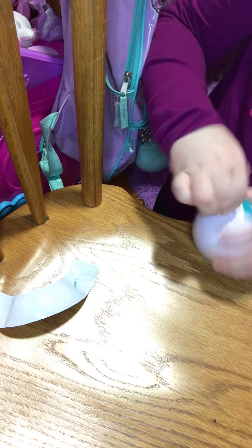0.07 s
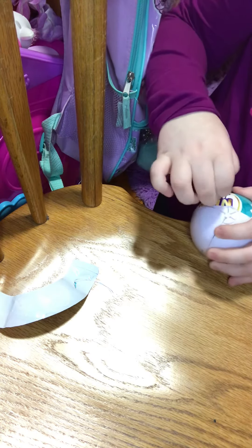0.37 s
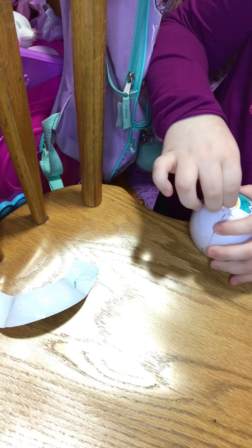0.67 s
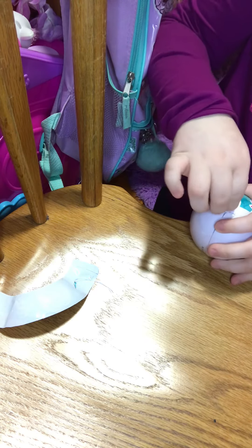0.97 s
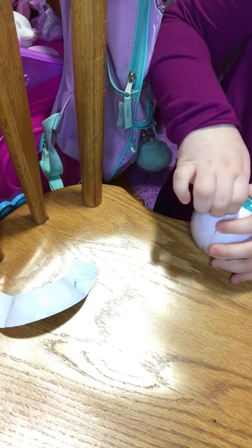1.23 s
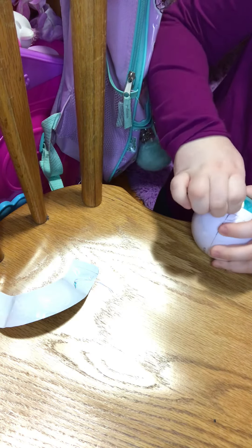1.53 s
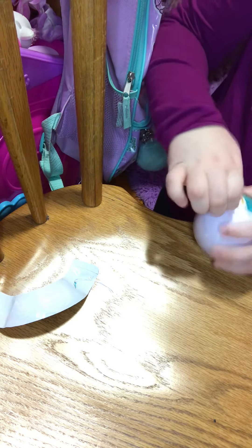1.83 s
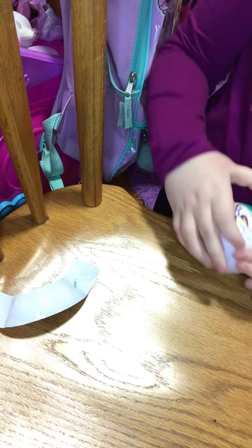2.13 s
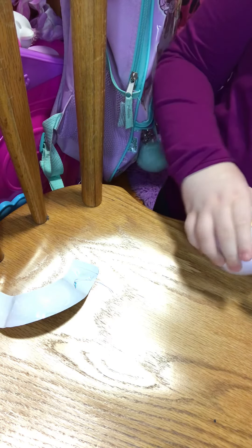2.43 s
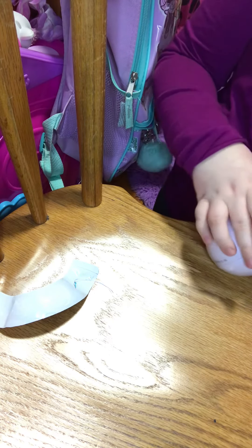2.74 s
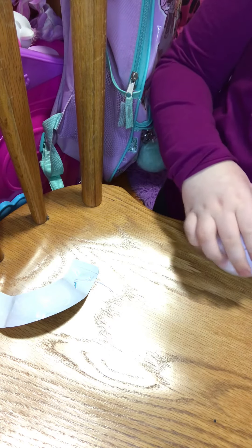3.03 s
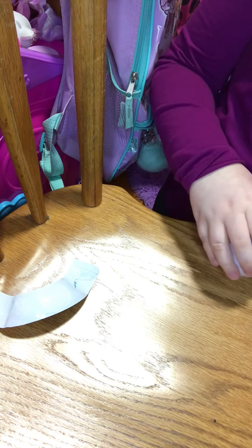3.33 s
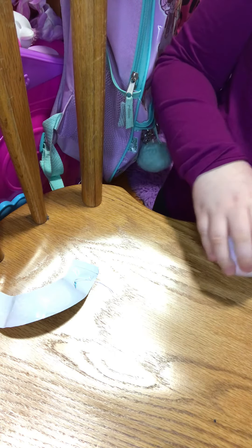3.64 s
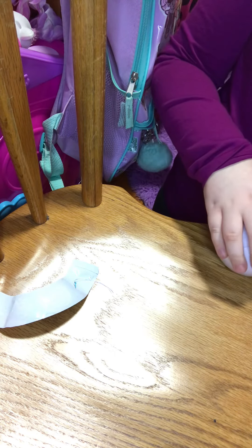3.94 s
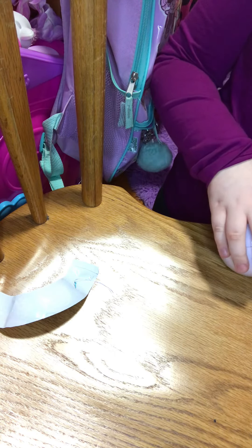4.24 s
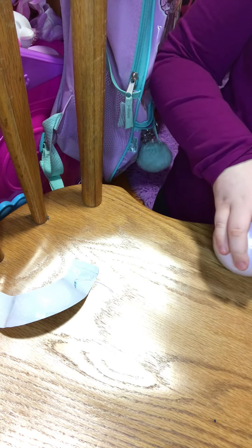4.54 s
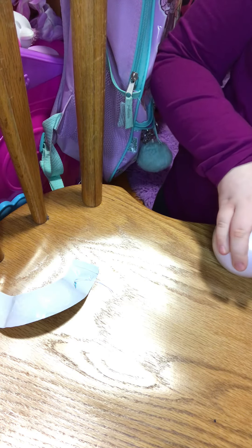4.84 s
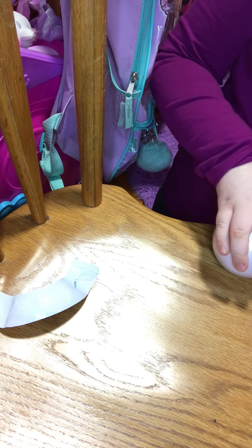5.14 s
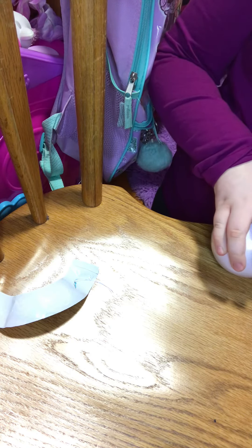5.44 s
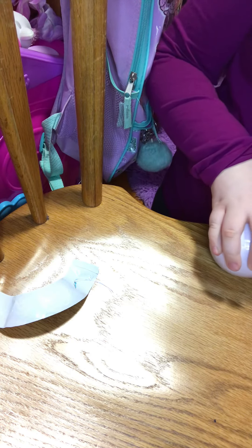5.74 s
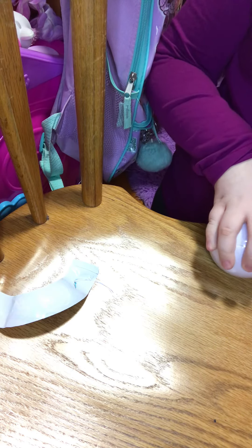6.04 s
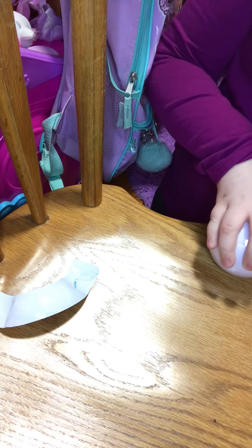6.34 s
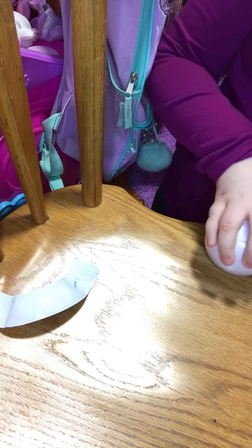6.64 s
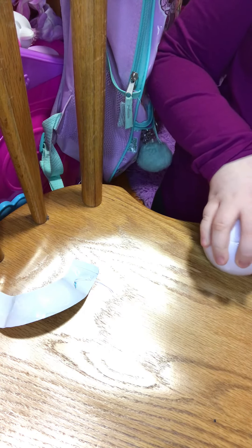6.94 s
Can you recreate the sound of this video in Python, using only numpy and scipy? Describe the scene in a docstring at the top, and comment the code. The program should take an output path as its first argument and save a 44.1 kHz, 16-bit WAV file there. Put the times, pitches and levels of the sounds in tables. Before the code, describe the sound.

Fingernails pick at the seam of a hollow plastic ball, making a cluster of short bright cracks as it knocks on a wooden seat. After a lull comes one sharp snap, then soft rubbing, small ticks and light bumps. Later the tight halves squeak thinly and scrape as they twist, followed by a couple more clicks and knocks. The sounds are close, in a small quiet room.

```python
"""Picking at a plastic ball

In a small quiet room, a child picks at the seam of a hollow plastic ball held against a wooden seat.
Nails and seam snap with short bright cracks, the ball bumps the wood and makes it ring, fingers rub
the shell, and the tight halves squeak thinly and scrape as they are twisted."""
import sys
import numpy as np
from scipy import signal
from scipy.fft import rfft, irfft
from scipy.io import wavfile
from scipy.ndimage import uniform_filter1d

SR = 44100
rng = np.random.default_rng(int(sys.argv[2]) if len(sys.argv) > 2 else 0)


def waveform_to_disk(signal):
    """Save audio, clipped to [-1, 1], as 16-bit WAV at the path in sys.argv[1]."""
    frames = np.transpose(np.atleast_2d(signal))
    scaled = np.clip(frames, -1, 1) * 32767
    samples = np.round(scaled).astype(np.int16)
    wavfile.write(sys.argv[1], SR, samples)


N = 308700
T = np.arange(N) / SR

# the notes the plastic shell rings at: (pitch [Hz], level [dB])
SHELL_NOTES = [(1040, -3), (1650, -5), (1950, -0.5), (2290, -7.5), (2700, -5.5), (2970, -1.5), (3780, 6.5),
               (4450, -5), (5200, -1.5), (5560, 4.5), (5850, -1), (6600, 3), (7550, -5), (8250, -16.5),
               (9280, -8), (11750, -5.5), (13400, -18.5), (14450, -12.5)]
# the notes the wooden seat rings at: (pitch [Hz], level [dB], time to fade by 60 dB [s])
WOOD_NOTES = [(271.3, -8.5, .45), (328.5, 3.5, .14), (359, 0, .2), (441, -14, .15), (515, -9.5, .13),
              (730, -6, 0.16), (824, -17.5, 0.11), (958, -2.5, .11), (1055, -12, 0.11), (1170, -13, 0.15),
              (1292, -20, .22)]
# the tone of a slip on the plastic: (frequency [Hz], level [dB])
CRACK_TONE = [(100, -22), (400, -14), (900, -6.5), (1900, -2.5), (3500, -2), (6500, -2.5), (8200, -10),
              (10300, -18), (12000, -14), (16000, -17.5)]


def undb(db):
    """Turn decibels into a number to multiply by."""
    return 10 ** (np.asarray(db) / 20)


def level(x, db):
    """Set a sound's average (rms) level."""
    return x * undb(db) / np.sqrt(np.mean(x ** 2))


def burst(x, db):
    """Give a short sound the energy of a hundredth of a second at this level."""
    return x * undb(db) * np.sqrt(SR / 100 / np.sum(x ** 2))


def fade(t, t60):
    """Die away by 60 dB every t60 seconds."""
    return np.exp(-np.log(1000) * t / t60)


def add(out, s, x):
    """Mix x into out, starting at s seconds."""
    i = max(int(s * SR), 0)
    out[i:i + len(x)] += x[:N - i]


def colour(x, points, size=4096):
    """Shape the tone of x along a curve of (frequency [Hz], level [dB]) points."""
    hz, db = np.transpose(points)
    grid_hz = np.arange(size // 2 + 1) * SR / size + 1
    log_gain = np.log(undb(np.interp(np.log(grid_hz), np.log(hz), db)))
    # build the filter so that it rings only after a hit, never before
    cepstrum = irfft(log_gain)[:size // 2]
    cepstrum[1:] *= 2
    response = irfft(np.exp(rfft(cepstrum, size)))
    return signal.fftconvolve(x, response)[:len(x)]


def contact(tilt_db, top_db=0):
    """Tone curve of a touch: a higher tilt, in dB per octave, is brighter."""
    return [(hz, tilt_db * np.log2(hz / 3000) + top_db * (hz > 7500)) for hz in (900, 6800, 8200, 12000)]


def resonate(x, hz, width_hz):
    """Let x ring at one pitch; a narrower width rings longer."""
    return signal.lfilter(*signal.iirpeak(hz, hz / width_hz, fs=SR), x)


def wander(rate):
    """A smooth random drift of about 1 either way, with `rate` new values a second."""
    hold = int(SR / rate)
    steps = np.repeat(rng.standard_normal(N // hold + 1), hold)
    return 1.3 * uniform_filter1d(uniform_filter1d(steps, hold), hold)[:N]


def friction(rate, spread_db):
    """Tiny slips of uneven strength at random moments, about `rate` a second."""
    sizes = undb(spread_db * np.minimum(rng.exponential(size=N), 5))
    happens = rng.random(N) < rate / SR
    return level(happens * sizes * rng.choice([-1, 1], N), 0)


def push(start_s, rise_s, hold_s, fade_db_per_s):
    """Loudness of one push of the fingers: it builds, holds and dies away."""
    t = T - start_s
    return np.clip(t / rise_s, 0, 1) * undb(-fade_db_per_s * np.clip(t - rise_s - hold_s, 0, 1))


def hush(air_db=-66.5, hum_db=-77):
    """Steady room noise, strongest in the bass, with a weak wavering electric hum."""
    # the tone of the quiet room: (frequency [Hz], level [dB])
    air_tone = [(12, -40), (20, -16.5), (43, -3), (86, -5.5), (123, -3), (150, -8.5), (328, -10),
                (399, -22), (527, -13.5), (624, -18.5), (976, -18.5), (2140, -24.5), (6360, -28),
                (14700, -38), (16000, -40)]
    air = level(colour(rng.standard_normal(N), air_tone), air_db) * undb(0.8 * wander(3.4))
    hum = level(np.sin(2 * np.pi * 119.7 * T), hum_db) * undb(4.7 * wander(5.6))
    return air + hum


def room(x, tail_db=-9.5, echo_db=-12, size=22050):
    """Near surfaces send back two smeared echoes; a short tail follows and loses its treble first."""
    # how the walls tint the sound: (frequency [Hz], level [dB])
    wall_tone = [(100, -1.5), (500, 1.5), (1000, 0), (2000, -3.5), (5000, -0.5), (9000, -3.5), (16000, -4)]
    t, noise = np.arange(size) / SR, rng.standard_normal(size)
    low = signal.sosfiltfilt(signal.butter(2, 1800, fs=SR, output="sos"), noise)
    below_top = signal.sosfiltfilt(signal.butter(2, 8000, fs=SR, output="sos"), noise)
    middle, high = below_top - low, noise - below_top
    tail = low * fade(t, t60=.41) + middle * fade(t, t60=.23) + high * fade(t, t60=.16)
    tail *= np.clip((t - .002) / .008, 0, 1)  # builds up over 8 ms
    echo_shape = sum(np.exp(-((t - delay_s) / .002) ** 2) for delay_s in (.0102, .0168))
    echoes = rng.standard_normal(size) * echo_shape
    response = tail * undb(tail_db) / np.linalg.norm(tail)
    response += echoes * undb(echo_db) / np.linalg.norm(echoes)
    return signal.fftconvolve(x, colour(response, wall_tone))[:N]


def rolling(creep_db=-78, waver_db=3):
    """The ball creeps on the seat and keeps the wood murmuring, louder when it rolls."""
    # small rolls of the ball: (middle [s], half length [s], level [dB])
    rolls = [(0.998, 0.043, -67.5), (2.195, 0.21, -61), (2.444, 0.18, -63.5), (2.862, 0.065, -69),
             (3.048, 0.18, -72.5), (3.605, 0.2, -70.5), (6.106, 0.053, -69)]
    grains = friction(rate=120, spread_db=1)
    wood = sum(undb(db - 4.5 * np.log2(hz / 350)) * resonate(resonate(grains, hz, 22), hz, 160)
               for hz, db, _ in WOOD_NOTES)
    motion = np.full(N, undb(creep_db))
    for s, half_s, db in rolls:
        add(motion, s - half_s, undb(db) * np.hanning(int(2 * half_s * SR)))
    return level(wood, 0) * motion * undb(waver_db * wander(12))


def jolts(t60=0.27, rise_s=0.017, size=22050):
    """A dull thump swells through arms and seat after a strong snap or a change of grip."""
    # jolts of the hands: (time [s], level [dB])
    thumps = [(0.037, -41.5), (.11, -41), (1.817, -44), (1.93, -50), (2.269, -57.5), (2.455, -59),
              (2.82, -56.5), (3.08, -57.5), (4.771, -45), (5.32, -58), (5.462, -44), (6.568, -44)]
    # their deep tone: (frequency [Hz], level [dB])
    thump_tone = [(25, -29), (48, -3), (80, -1), (130, 5), (200, -12), (400, -16), (1000, -47), (4000, -86)]
    out, t = np.zeros(N), np.arange(size) / SR
    swell = fade(t, t60) * (1 - np.exp(-t / rise_s))
    for s, db in thumps:
        add(out, s, burst(colour(rng.standard_normal(size) * swell, thump_tone), db))
    return out


def bumps(spot_lift_db=5.5, spot_octaves=0.24, scatter_db=2.5, press_s=0.0016, size=22050):
    """The wood rings and thuds under each bump; soft bumps stir mostly its lowest notes."""
    # the ball hits the seat:
    # (time [s], level [dB], hardness [dB per octave], struck spot's note [Hz], thud against ring [dB])
    hits = [(.04, -42.5, 1, 323, -8), (.109, -44, -7, 325, -5), (.126, -40, -2, 510, -4),
            (.1355, -28, 1, 970, -9), (1.258, -56.5, -4, 330, -3), (1.38, -59.5, 11, 965, -4),
            (1.821, -37.5, -2.5, 270, -13), (2.038, -37.5, -2.5, 732, -15), (2.223, -47.5, -2.5, 316, -18),
            (2.365, -60, 3.5, 960, -16), (2.465, -51, 4, 840, -24), (2.828, -56.5, -21, 270, -7),
            (3.178, -53.5, -2, 364, -14), (3.525, -55, -3, 325, -14), (4.279, -42.5, -8, 270, -20),
            (4.773, -47.5, -0.5, 270, 1), (5.008, -58, -4, 364, -10), (5.319, -55, -9, 357, -14),
            (5.465, -50.5, 3.5, 1184, -6), (6.2837, -37.5, -7.5, 360, -3), (6.575, -43.5, 4, 364, -3.5)]
    # the dull thud: (frequency [Hz], level [dB])
    thud_tone = [(60, -16.5), (180, -10), (300, 2), (550, -5), (1200, -6.5), (1700, -20), (5000, -40.5)]
    out, t = np.zeros(N), np.arange(size) / SR
    hz, note_db, t60 = np.transpose(WOOD_NOTES)
    for s, db, hard_db, spot_hz, thud_db in hits:
        detuned_hz = hz * (1 + .004 * rng.standard_normal(len(hz)))
        notes = np.sin(2 * np.pi * np.outer(detuned_hz, t)) * fade(t, t60[:, None])
        # each spot on the seat favours the notes near its own
        spot_db = spot_lift_db * np.exp(-(np.log2(hz / spot_hz) / spot_octaves) ** 2)
        spot_db += scatter_db * rng.standard_normal(len(hz))
        ring = undb(note_db + spot_db + hard_db * np.log2(hz / 350)) @ notes
        # the ball pressing on the wood soon takes the first strength out of the ring
        ring *= (1 + undb(-3) * fade(t, t60=.01)) * (1 - np.exp(-t / press_s)) ** 2
        thud = colour(rng.standard_normal(size) * fade(t, t60=.078), thud_tone)
        add(out, s, burst(burst(ring, 0) + burst(thud, thud_db), db))
    return signal.sosfilt(signal.butter(2, 170, "high", fs=SR, output="sos"), out)


def rubs(catch_db=-1):
    """Skin and nails drag over the shell in grainy swells; it ticks whenever a nail catches."""
    # finger strokes: (middle [s], half length [s], level [dB], brightness [dB per octave])
    strokes = [(0.164, 0.099, -58, -5.5), (1.86, 0.063, -52, -1.5), (2.126, 0.29, -68, -4.5),
               (2.51, 0.33, -72, 2), (2.993, 0.065, -71.5, 3.5), (3.174, 0.028, -63, -6),
               (3.369, 0.22, -77.5, 0.5), (3.536, 0.053, -58, 1.5), (3.664, .12, -74, 3),
               (3.938, 0.043, -71.5, -0.5), (4.281, 0.043, -65.5, -5), (4.719, 0.022, -64.5, -2.5),
               (4.993, 0.033, -51.5, 2.5), (6.432, 0.1, -73, -1)]
    catches = friction(rate=49, spread_db=-1)
    ticks = sum(undb(db) * resonate(catches, hz, 170) for hz, db in SHELL_NOTES)
    grains = colour(friction(rate=2300, spread_db=2), CRACK_TONE)
    rubbing = level(grains, 0) + level(ticks, catch_db)
    out = np.zeros(N)
    for s, half_s, db, tilt_db in strokes:
        start, count = s - half_s, int(2 * half_s * SR)
        stroke = rubbing[int(start * SR):][:count]
        add(out, start, level(colour(stroke, contact(tilt_db)), db) * np.hanning(len(stroke)))
    return out


def chirps(width_hz=200):
    """A fingertip sticks and slips on the shell, ringing briefly around one pitch."""
    # fingertip skids: (middle [s], half length [s], pitch [Hz], level [dB])
    skids = [(3.013, .005, 3430, -63.5), (3.023, 0.0041, 3270, -59), (3.024, 0.0048, 2050, -58.5),
             (6.754, 0.023, 3500, -62), (6.756, .022, 2830, -62.5), (6.747, 0.026, 1840, -68.5)]
    out, slips = np.zeros(N), friction(rate=7000, spread_db=-2)
    for s, half_s, hz, db in skids:
        start, count = s - half_s, int(2 * half_s * SR)
        ringing = resonate(resonate(slips, hz, width_hz), hz, 2 * width_hz)
        tone = ringing[int(start * SR):][:count]
        add(out, start, level(tone, db) * np.hanning(len(tone)))
    return out


def scrapes(hiss_db=-18, waver_db=1.5, fade_db_per_s=146.5):
    """Crowded slips make the seam ring and hiss; each twist has its own loudness and brightness."""
    # the notes the sliding seam rings at: (pitch [Hz], width [Hz], level [dB])
    seam_notes = [(2710, 400, -17), (3495, 65, 4.5), (4190, 160, -1), (7400, 360, -12), (8680, 92, 0),
                  (8980, 120, -5), (12900, 600, -19.5), (15300, 500, -16)]
    # the overall tone of a scrape: (frequency [Hz], level [dB])
    scrape_tone = [(1000, 0.5), (7000, 2.5), (9300, 1), (10200, -9), (14800, -6.5), (16000, -18)]
    # twists of the halves: (start [s], rise [s], hold [s], level [dB], brightness [dB per octave])
    twists = [(5.223, 0.022, 0.044, -81.5, 3), (5.536, .06, 0.06, -64.5, -3),
              (5.97, 0.05, 0.055, -78.5, -7), (6.094, 0.011, 0.042, -47, 2.5)]
    out, slips = np.zeros(N), friction(rate=11000, spread_db=2.5)
    rim = sum(undb(db) * resonate(slips, hz, width_hz) for hz, width_hz, db in seam_notes)
    seam = colour(rim + undb(hiss_db) * resonate(slips, 7800, 8000), scrape_tone)
    for s, rise_s, hold_s, db, tilt_db in twists:
        out += level(colour(seam, contact(tilt_db)), db) * push(s, rise_s, hold_s, fade_db_per_s)
    return out * undb(waver_db * wander(90))


def squeaks(rise_s=0.0067, waver_hz=14, flutter_db=1, rough_db=-5):
    """The tight seam sings on one of its notes: a thin, fluttering tone with a rough edge."""
    # squeaky twists: (start [s], hold [s], pitch [Hz], level [dB], fade [dB per s])
    twists = [(4.797, .008, 4200, -62, 600), (4.837, .03, 4190, -60, 300),
              (4.919, 0.0097, 4212, -49.5, 2010.5), (4.943, 0.035, 4200, -49, 128),
              (4.904, .04, 3540, -72, 200), (5.08, 0.033, 3500, -66, 249.5),
              (5.15, 0.13, 3515, -77.5, 103.5), (5.178, 0.034, 4212, -73, 200)]
    out = np.zeros(N)
    for s, hold_s, hz, db, fade_db_per_s in twists:
        phase = 2 * np.pi * np.cumsum(hz + waver_hz * wander(120)) / SR
        rough = resonate(resonate(rng.standard_normal(N), hz, 110), hz, 450)
        tone = level(np.sin(phase), db) + level(rough, db + rough_db)
        out += tone * push(s, rise_s, hold_s, fade_db_per_s)
    return out * undb(flutter_db * wander(60))


def snaps(grit_db=2, spike_db=-2, scatter_db=2, size=2048):
    """A nail slips off an edge and the shell rings; returns the sound sent ahead and all around."""
    # snaps of nail and seam: (time [s], level [dB], brightness [dB per octave],
    # boost above 8 kHz [dB], slip length [s], struck spot's note [Hz], lowest pitch [Hz])
    picks = [(0.0358, -26, -1, 4, 0.0037, 2980, 300), (0.049, -45.5, -2.5, -11, .002, 1180, 600),
             (0.068, -43, -0.5, 2, .003, 3000, 900), (0.0916, -49.5, -1, 5, .0015, 5600, 1500),
             (0.0938, -49, -3, 0, .0015, 2010, 900), (.1065, -38, -5, -5, 0.0052, 3940, 600),
             (0.1344, -44, -2.5, -8, .0015, 5360, 600), (0.5917, -49.5, 2, 12.5, 0.0031, 5500, 2200),
             (.599, -38.5, 3, 1, 0.0022, 4530, 3900), (1.381, -58.5, -8.5, 0, 0.0041, 1320, 400),
             (1.8169, -19, 2.5, 10, 0.0016, 14600, 397), (1.907, -46.5, -5.5, -19, 0.0021, 3400, 710),
             (1.9645, -60, -8, -9, .003, 980, 500), (2.03, -57.5, 2.5, -0.5, 0.0018, 5400, 2000),
             (2.081, -57, 0, 5, 0.0014, 5420, 1200), (2.114, -63.5, -10, -6, .003, 1780, 1000),
             (2.158, -63.5, 1, 0, 0.0019, 5500, 2000), (2.171, -60, 2, 5, 0.0018, 6260, 2500),
             (2.263, -65.5, -2, -3, .002, 6240, 3000), (3.18, -60.5, -4.5, -2, .005, 1180, 500),
             (3.526, -50, 8, 8, 0.0047, 5700, 1800), (3.547, -54.5, 7.5, 9.5, 0.0029, 5430, 3500),
             (3.579, -67, -1.5, -1, 0.0022, 6700, 3000), (3.6884, -60.5, 10, -4, 0.0036, 7200, 3000),
             (4.276, -55.5, -3.5, 0, 0.0031, 2030, 600), (4.285, -55, 4, -12, .002, 1180, 600),
             (4.7693, -31, 0.4, 0, 0.0042, 2236, 710), (4.8695, -48.5, -0.5, -6, .0027, 3960, 695),
             (5.0052, -44, 3, 2, 0.0013, 4150, 600), (5.02, -48, 9, 1, 0.0036, 6820, 1500),
             (5.3163, -59, -0.5, 4.5, 0.0039, 3740, 695), (5.4592, -57.5, -2.5, 1.5, .0015, 2090, 1504),
             (5.4634, -41.5, -3, 4.5, 0.0055, 2120, 700), (5.475, -53, -3.5, -5, 0.0034, 2700, 1800),
             (5.7127, -46.5, -0.5, 7.5, 0.0026, 6910, 1400), (6.281, -46.5, 1, 0, 0.0021, 2270, 1200),
             (6.2831, -38.5, -3.5, -4, 0.0034, 2550, 400), (6.572, -32.5, -2.5, -2.5, 0.00099, 2510, 1110),
             (6.5812, -46, -2, -10, .002, 5470, 1200), (6.715, -57, 6, -3, 0.00082, 5200, 2000)]
    ahead, around, t = np.zeros(N), np.zeros(N), np.arange(size) / SR
    hz, note_db = np.transpose(SHELL_NOTES)
    # the release itself is one sharp spike
    spike = colour(np.diff(np.exp(-t / 0.000088), prepend=0), CRACK_TONE)
    smooth_click = colour(signal.unit_impulse(size), CRACK_TONE)
    for s, db, tilt_db, top_db, slip_s, spot_hz, lowest_hz in picks:
        # each spot on the ball favours other notes, and the grip detunes them
        gains = undb(note_db + scatter_db * rng.standard_normal(len(hz)))
        gripped_hz = hz * (1 + 0.021 * rng.standard_normal(len(hz)))
        phase = 2 * np.pi * (np.outer(gripped_hz, t) + rng.random((len(hz), 1)))
        ring = gains @ np.sin(phase) * fade(t, t60=.011) * (1 - np.exp(-t / 0.00019))
        grit = colour(rng.standard_normal(size) * np.exp(-(t / slip_s) ** 2), CRACK_TONE)
        crack = burst(ring, 0) + burst(grit, grit_db) + burst(spike, spike_db)
        # a small piece of the rim gives off little below its lowest pitch
        low_cut = signal.butter(3, lowest_hz, "high", fs=SR, output="sos")
        for track, sound in ((ahead, crack), (around, smooth_click)):
            shaped = signal.sosfilt(low_cut, colour(sound, contact(tilt_db, top_db)))
            add(track, s, burst(shaped, db))
        # the struck spot adds its own note, weaker the higher it is
        spot_note = np.sin(2 * np.pi * spot_hz * t) * fade(t, t60=.014)
        add(ahead, s, burst(spot_note, db - 3 - 3 * np.log2(spot_hz / 2300)))
    return ahead, around


def snaps_in_room(ahead_db=-6, around_db=-4.5):
    """The walls answer each crack, and also the smoother sound the shell sends in other directions."""
    ahead, around = snaps()
    return ahead + undb(ahead_db) * room(ahead) + undb(around_db) * room(around)


def scene():
    """All the handling sounds over the room's hush, in one channel."""
    sliding = rubs() + chirps() + scrapes()
    plastic = snaps_in_room() + sliding + room(sliding) + squeaks()
    seat = bumps() + jolts() + rolling()
    return (plastic + seat + hush())[None]


def record(dry, lowest_hz=35, highest_hz=16200):
    """The phone drops the deepest bass and the highest treble."""
    bass_cut = signal.sosfilt(signal.butter(6, lowest_hz, "high", fs=SR, output="sos"), dry)
    return signal.sosfilt(signal.ellip(8, .2, 70, highest_hz, fs=SR, output="sos"), bass_cut)


dry = scene()
out = record(dry)
waveform_to_disk(out)
```